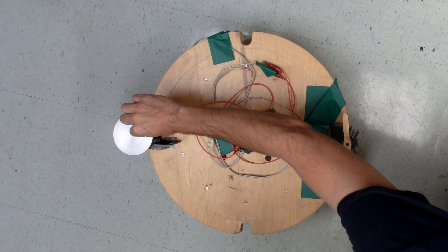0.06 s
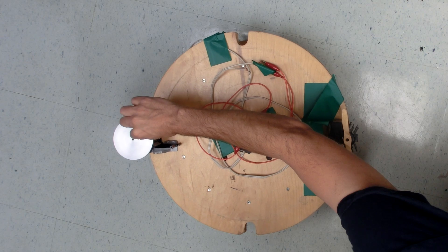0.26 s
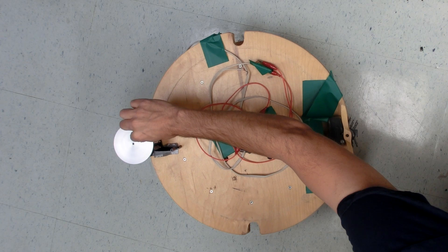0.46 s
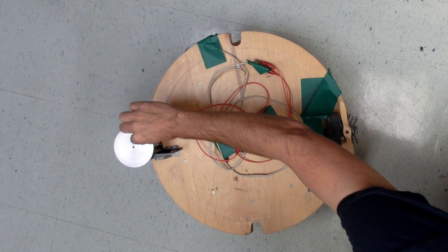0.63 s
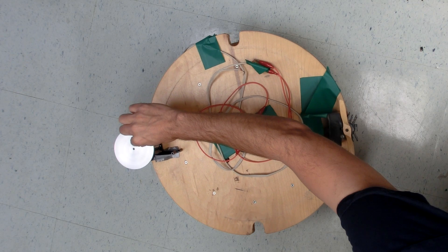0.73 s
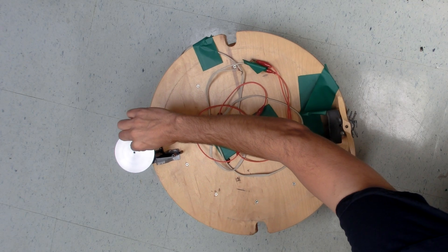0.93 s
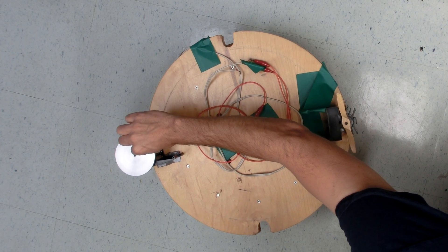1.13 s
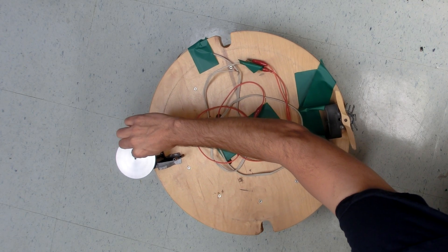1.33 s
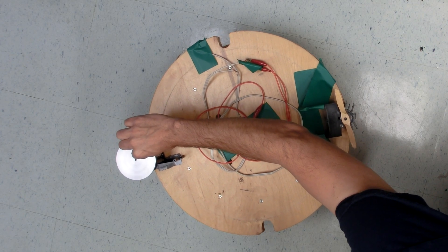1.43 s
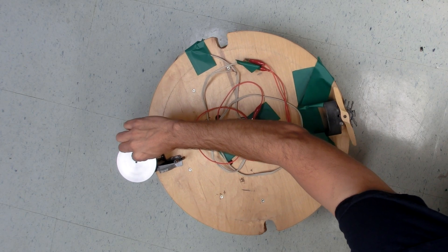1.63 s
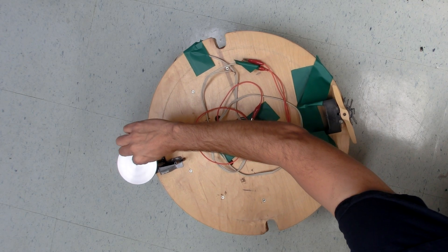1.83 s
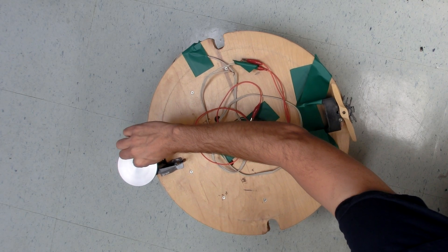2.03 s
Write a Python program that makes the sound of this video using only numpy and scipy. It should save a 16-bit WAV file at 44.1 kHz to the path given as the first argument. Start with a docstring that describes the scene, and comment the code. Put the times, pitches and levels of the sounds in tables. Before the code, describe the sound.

A thin, high-pitched squeal wavers as fingers brake a spinning disk, over a low room hum

```python
"""Fingers braking a spinning disk

Fingers brake a small motor-driven disk before two microphones, with floor and walls near by.
Friction sets four high modes squealing: wavering partials beat over a randomly rung resonance.
Shaped noise makes the dry hiss of the rubbing; noise and unsteady sines make the room's low rumble and hum.
One light knock, short decaying modes and a puff of noise, comes at the very end."""
import sys
import numpy as np
from scipy import signal
from scipy.fft import rfft, irfft, next_fast_len
from scipy.io import wavfile
from scipy.ndimage import uniform_filter1d, map_coordinates

SR = 44100
rng = np.random.default_rng(int(sys.argv[2]) if len(sys.argv) > 2 else 0)


def persist_wave(psi):
    """Save psi, clipped to +-1, as 16-bit WAV."""
    counts = np.round(np.clip(psi, -1, 1) * 32767).astype(np.int16)
    wavfile.write(sys.argv[1], SR, np.atleast_2d(counts).T)


N = 92213  # samples

# Drive of the low squeal, shifting between two partials: t/s, lower level/dB, upper level/dB
LOW_DRIVE = [(0.0, -64, -45), (0.19, -49.5, -54.5), (0.22, -66, -40.5), (0.3, -57, -44.5), (0.38, -48, -45),
             (0.43, -53, -48.5), (0.61, -51.5, -60), (0.76, -50, -44), (0.84, -46, -56.5),
             (0.98, -51.5, -48), (1.08, -61, -46.5), (1.11, -38.5, -69), (1.25, -46.5, -46.5),
             (1.34, -52, -54), (1.42, -61, -46), (1.49, -54.5, -51.5), (1.63, -48, -54.0),
             (1.71, -44.5, -60), (1.9, -49, -60), (1.94, -48.5, -49), (2.05, -53, -53), (2.09, -56, -54)]
# Drive of the weak squeal between low and high, both partials together: t/s, level/dB
MIDDLE_DRIVE = [(0.0, -60.5), (0.16, -53), (0.48, -74), (0.6, -56), (0.82, -49.5), (0.97, -83), (1.09, -60),
                (1.17, -71), (1.23, -58), (1.58, -76), (1.59, -66), (2.07, -52.5), (2.09, -47)]
# Drive of the high squeal, shifting between two partials: t/s, lower level/dB, upper level/dB
HIGH_DRIVE = [(0.0, -51, -51.5), (0.17, -49.5, -52), (0.25, -38, -65), (0.33, -47.5, -50.5),
              (0.38, -38.5, -57), (0.56, -43, -41.5), (0.61, -54, -44.5), (0.74, -47, -43),
              (0.84, -64, -43.5), (0.91, -47.5, -50), (1.0, -48.5, -46), (1.08, -52.5, -47.5),
              (1.16, -63, -44), (1.28, -37.5, -39), (1.31, -57, -42.5), (1.42, -41.5, -45),
              (1.54, -40.5, -44), (1.69, -44, -44.5), (1.81, -41, -41.5), (1.92, -51, -53),
              (2.02, -44.5, -49.5), (2.09, -56, -36)]
# Drive of the topmost whistle, both partials together: t/s, level/dB
TOP_DRIVE = [(0, -59), (.2, -57), (.5, -61), (.8, -68), (.88, -56), (1.07, -56), (1.12, -65), (1.3, -64),
             (1.35, -56), (1.45, -61), (1.6, -66), (1.78, -64), (1.95, -62), (2.09, -57)]
# Partials of each squeal: f/Hz, pitch wander/Hz, level against the drive/dB, left over right/dB
LOW_MODES = [(4057, 7, -2.3, 2.5), (4108, 15, -4, 5)]
MIDDLE_MODES = [(7105, 17.7, -7, 1.4), (7120, 19.3, -9.5, 3)]
HIGH_MODES = [(9225, 7, -3, 0), (9296, 15, -4, .5)]
TOP_MODES = [(15392, 14, -5, 2), (15738, 6, -17, 0)]

# Strength of the rubbing, before an overall trim: t/s, level/dB
RUB_STRENGTH = [(0, -70), (.14, -61.5), (.22, -58), (.5, -57), (.66, -55), (.76, -55), (.82, -53),
                (.95, -54.5), (1.07, -59.5), (1.13, -54), (1.25, -53.5), (1.38, -56.5), (1.52, -53),
                (1.58, -54), (1.71, -54), (1.85, -53.5), (1.92, -59.5), (2.06, -59.5)]
# Colour of the rubbing, relative density: f/Hz, level/dB per Hz
RUB_COLOUR = [(400, -25), (1200, -11), (1650, -3.5), (2150, 0), (2900, -5), (3400, -2), (3730, 1.5),
              (4350, 3.5), (5150, -1.5), (5900, -4.5), (7900, -4.5), (8800, 1.5), (9500, -2), (10100, -2),
              (12000, -14), (15500, -9.5)]
# Narrow resonances that the rubbing excites: f/Hz, half-width/Hz, level against the hiss/dB
RUB_RESONANCES = [(1590, 16, 4), (2040, 30, 4), (2420, 6.3, 5), (3490, 15, 7.5), (4400, 11, 12),
                  (4540, 17, -10), (5200, 20, 8), (9900, 30, -4)]
# Left-right likeness of the rubbing: f/Hz, likeness (0-1)
RUB_LIKENESS = [(500, 1), (4000, 1), (9000, 0.26), (14000, 0)]

# Colour of the room's drone and air, relative density: f/Hz, level/dB per Hz
DRONE_COLOUR = [(30, -32), (75, -39), (100, -4.5), (127, -9), (143, -9.5), (172, -9), (215, -15),
                (330, -19.5), (480, -22), (900, -27), (1020, -26), (1200, -28.5), (2200, -31),
                (6000, -36.5), (12000, -38.5), (15500, -37)]
# Colour of the deep rumble, relative density: f/Hz, level/dB per Hz
RUMBLE_COLOUR = [(20, -11.5), (39, -14), (50, -2.5), (59, -2), (65, -0.5), (72, -1), (85, -9.5),
                 (110, -11.5), (200, -44.5)]
# Left-right likeness of drone and rumble: f/Hz, likeness (0-1)
ROOM_LIKENESS = [(100, 0.95), (300, 0.87), (1000, 0.79), (5000, .6), (14000, 0.072)]
# Bass in the room, before overall trims: t/s, rumble level/dB, main hum level/dB
BASS_LEVELS = [(0.0, -46, -44.0), (0.14, -54.5, -47.5), (0.21, -41.5, -52.5), (0.33, -44.5, -45.5),
               (0.46, -45.5, -41), (0.53, -46.5, -51), (0.62, -52, -46), (0.68, -43.5, -51.0),
               (0.76, -45, -44), (0.81, -50, -43.0), (0.91, -51, -43), (0.97, -48, -50.5),
               (1.06, -42.5, -43), (1.18, -47, -54), (1.23, -48.5, -46), (1.36, -44.5, -41.5),
               (1.52, -52.5, -56), (1.56, -46.0, -57), (1.7, -43, -39), (1.74, -47.5, -50.5),
               (1.97, -45.5, -49), (2.09, -44.5, -53)]
# Weaker hum lines, before their swell: f/Hz, rms level/dB
HUM_LINES = [(161.5, -54), (247.6, -63), (360.7, -67)]
HUM_HZ = 122.8  # main hum line

# Ringing modes of the knock: f/Hz, level against the knock/dB, t60/s
KNOCK_RINGS = [(650, 2, 0.062), (988, -0.5, 0.047), (3360, 0, 0.03), (3670, -6, .012)]
KNOCK_S, KNOCK_DB, KNOCK_ATTACK_S = 2.0675, -37, 0.0024  # onset, level, time constant of the rise

LEFT_DB = 3  # left over right, for all but the squeals' held partials
SIDE_DB = -6  # reflections, left-right difference against their middle
TOP_HZ = 15800  # band limit of the camera


def amp(db):
    """Decibels to gain."""
    return 10 ** (np.asarray(db) / 20)


def unit(x):
    """Scale to rms 1."""
    return x / np.sqrt(np.mean(x ** 2) + 1e-20)


def pan(db):
    """Left and right gains for a level difference."""
    return amp([[db / 2], [-db / 2]])


def along(points, hz):
    """Interpolate (f/Hz, value) points on a log frequency axis."""
    f, v = np.transpose(points)
    return np.interp(np.log(hz + 1), np.log(f + 1), v)


def curves(rows):
    """One value per sample for each column after the time."""
    s, *cols = np.transpose(rows)
    return np.array([np.interp(np.arange(N) / SR, s, c) for c in cols])


def wobble(rate):
    """A smooth random curve, rate knots a second."""
    knots = rng.standard_normal(N // 20)
    return map_coordinates(knots, [np.arange(N) * rate / SR], mode="wrap")


def filtered(x, response):
    """Weight the spectrum of x by a response of frequency."""
    m = next_fast_len(N + SR // 2)
    hz = np.fft.rfftfreq(m, 1 / SR)
    return irfft(rfft(x, m) * response(hz), m)[..., :N]


def noise(gain, likeness):
    """Stereo noise whose middle has rms 1; gain and left-right likeness are functions of frequency."""
    def mid_side_gain(hz):
        # the angle shares power between middle and side so that the two microphones correlate as asked
        turn = np.arccos(np.clip(likeness(hz), -.9, 1)) / 2
        return gain(hz) * np.array([np.cos(turn), np.sin(turn)])

    mid, side = filtered(rng.standard_normal((2, N)), mid_side_gain)
    return np.array([mid + side, mid - side]) / mid.std()


def tone(hz, wander_hz, rate):
    """A sine of rms 1 whose pitch wanders at random."""
    turns = rng.random() + np.cumsum(hz + wander_hz * wobble(rate)) / SR
    return np.sqrt(2) * np.sin(2 * np.pi * turns)


def reflections(x, t60=0.15, db=-3):
    """Floor and walls near by add a short tail and a fine ripple of colour."""
    t = np.arange(SR // 4) / SR
    decay = amp(-60 * t / t60)
    mid, side = rng.standard_normal((2, len(t))) * decay * np.array([[1], [amp(SIDE_DB)]])
    tail = np.array([mid + side, mid - side]) / np.linalg.norm(mid)
    # mirrored sound ahead of the start, so that the tail is already present there
    lead_in = np.pad(x, ((0, 0), (len(t) - 1, 0)), mode="reflect")
    reflected = signal.fftconvolve(lead_in, tail, "valid", axes=1)
    return (x + amp(db) * reflected) / np.hypot(1, amp(db))


def squeal(levels, partials, ring_hz, width, ring_db, alike, flutter_db):
    """Self-excited partials beat over the same resonance rung at random by the friction."""
    drives = np.broadcast_to(amp(curves(levels)), (len(partials), N))
    held = 0
    for drive, (hz, wander_hz, db, lean_db) in zip(drives, partials):
        flutter = amp(db + flutter_db * wobble(70))
        held = held + drive * pan(lean_db) * flutter * tone(hz, wander_hz, rate=90)

    resonance = lambda hz: 1 / (1 + ((hz - ring_hz) / width) ** 2)
    ring = pan(LEFT_DB) * noise(resonance, lambda hz: alike + 0 * hz)
    driven_ring = amp(ring_db) * drives.mean(axis=0) * ring
    return held + reflections(driven_ring, t60=0.24, db=0.5)


def squeals():
    """The four modes that the braking fingers set singing."""
    # ring_hz and width in Hz; alike is left-right likeness, negative towards opposite phase
    low = squeal(LOW_DRIVE, LOW_MODES, ring_hz=4087.4, width=61.4, ring_db=0.5, alike=0.51, flutter_db=3.5)
    middle = squeal(MIDDLE_DRIVE, MIDDLE_MODES, ring_hz=7115, width=91, ring_db=-5.5, alike=0.34,
                    flutter_db=3.5)
    high = squeal(HIGH_DRIVE, HIGH_MODES, ring_hz=9266, width=65, ring_db=-3.0, alike=-0.34,
                  flutter_db=2.44)
    top = squeal(TOP_DRIVE, TOP_MODES, ring_hz=15400, width=45, ring_db=-4, alike=-0.68, flutter_db=4.0)
    return low + middle + high + top


def rubbing(db=4, grain_db=1.8, grain_rate=350, surge_db=1.64):
    """Skin slides on the disk: a slightly grainy hiss that follows the pressure and rings narrow resonances."""
    def colour(hz):
        peak_power = sum(amp(gain_db) ** 2 / (1 + ((hz - f) / half_width) ** 2)
                         for f, half_width, gain_db in RUB_RESONANCES)
        return amp(along(RUB_COLOUR, hz)) * np.sqrt(1 + peak_power)

    hiss = noise(colour, lambda hz: along(RUB_LIKENESS, hz))
    grain = grain_db * wobble(grain_rate)
    surge = surge_db * wobble(28.04)
    return reflections(amp(db + curves(RUB_STRENGTH) + grain + surge) * hiss)


def room(rumble_db=1.0, drone_db=-50, hum_db=-2, swell_db=2):
    """Machinery hums in unsteady lines over a steady drone and a deep, surging rumble."""
    alike = lambda hz: along(ROOM_LIKENESS, hz)
    rumble_level, hum_level = amp(curves(BASS_LEVELS))
    rumble = noise(lambda hz: amp(along(RUMBLE_COLOUR, hz)), alike)
    # even out the noise's own surges over 3000 samples, so that the level table sets them
    power = uniform_filter1d(np.mean(rumble ** 2, axis=0), size=3000)
    rumble = rumble / np.sqrt(np.abs(power))

    drone = noise(lambda hz: amp(along(DRONE_COLOUR, hz)), alike)
    hum = amp(hum_db) * hum_level * tone(HUM_HZ, wander_hz=3.65, rate=17)
    lines = sum(amp(db + swell_db * wobble(8.92)) * tone(hz, wander_hz=3.14, rate=14)
                for hz, db in HUM_LINES)
    return amp(rumble_db) * rumble_level * rumble + amp(drone_db) * drone + hum + lines


def knock(noise_db=-7, noise_t60=0.12, dull_hz=1500):
    """A light knock: a few short decaying modes and a dull puff of noise."""
    t = np.maximum(np.arange(N) / SR - KNOCK_S, 0)  # time since the onset
    ring = sum(amp(db - 60 * t / t60) * np.sin(2 * np.pi * hz * t) for hz, db, t60 in KNOCK_RINGS)
    puff = unit(filtered(rng.standard_normal(N), lambda hz: 1 / (1 + (hz / dull_hz) ** 2)))
    puff = amp(noise_db - 60 * t / noise_t60) * puff
    attack = 1 - np.exp(-t / KNOCK_ATTACK_S)
    return amp(KNOCK_DB) * attack * (ring + puff)


def scene():
    """Squeal, rubbing, room and knock at the two microphones."""
    return squeals() + pan(LEFT_DB) * (rubbing() + room() + knock())


def record(dry):
    """The camera keeps nothing above its band limit."""
    return filtered(dry, lambda hz: hz < TOP_HZ)


dry = scene()
out = record(dry)
persist_wave(out)
```